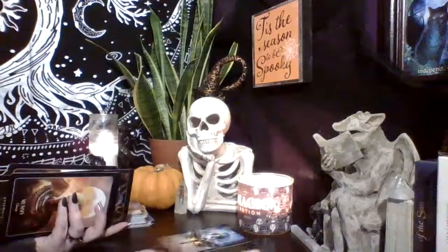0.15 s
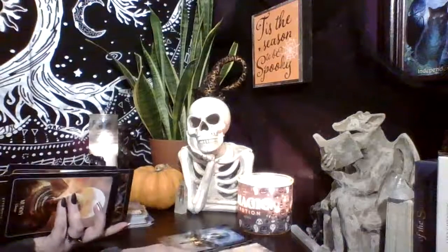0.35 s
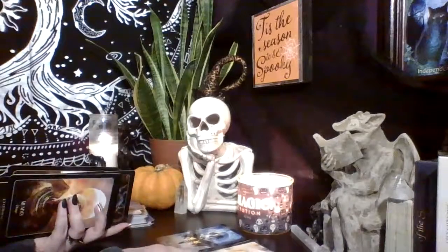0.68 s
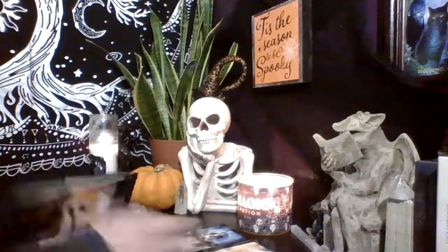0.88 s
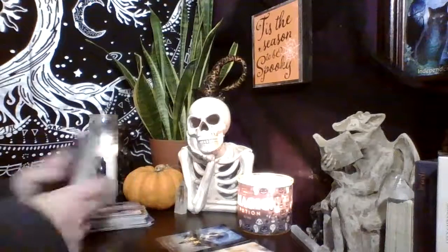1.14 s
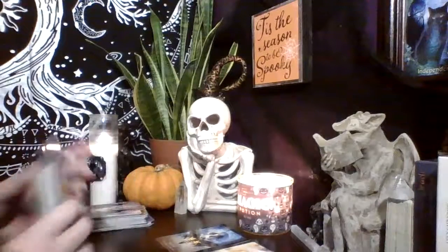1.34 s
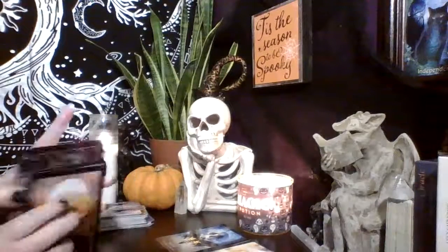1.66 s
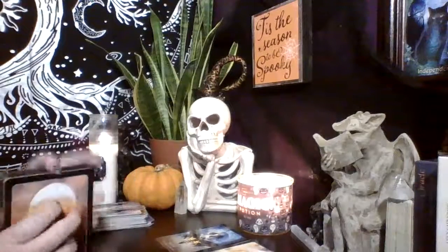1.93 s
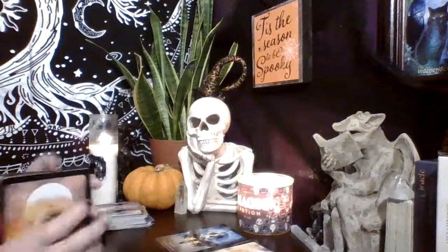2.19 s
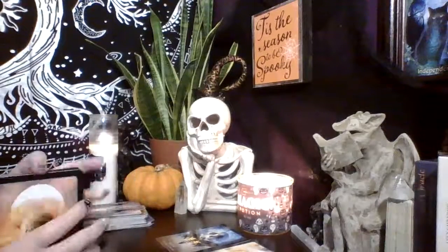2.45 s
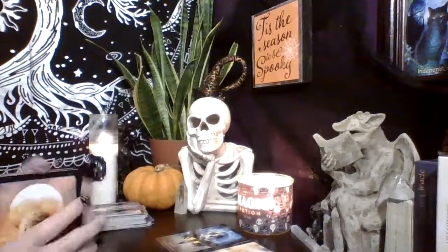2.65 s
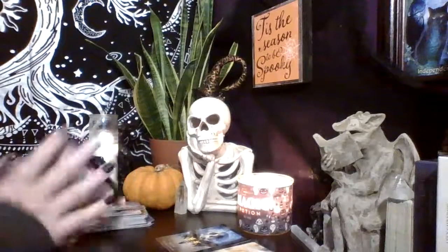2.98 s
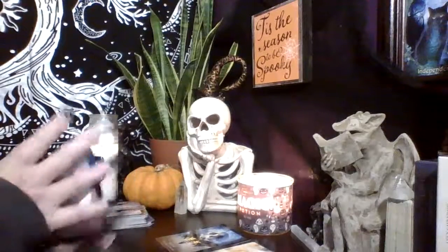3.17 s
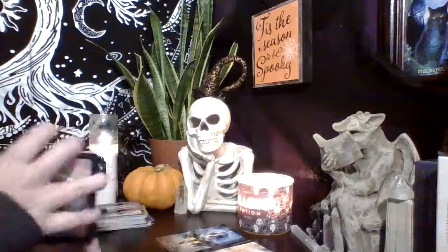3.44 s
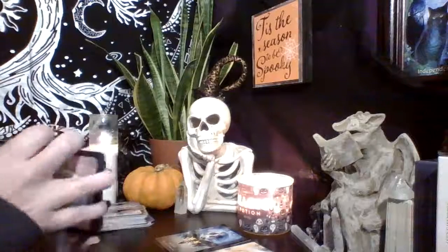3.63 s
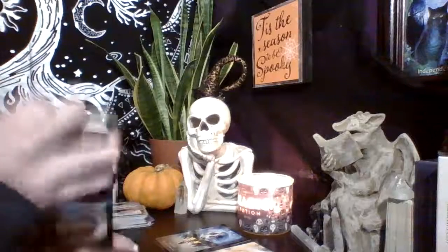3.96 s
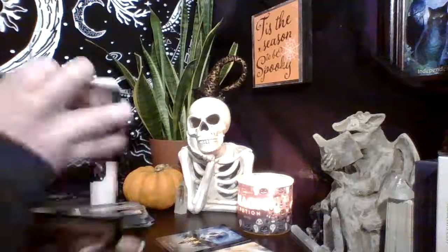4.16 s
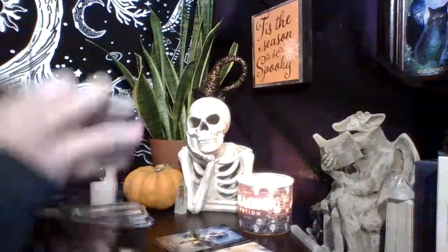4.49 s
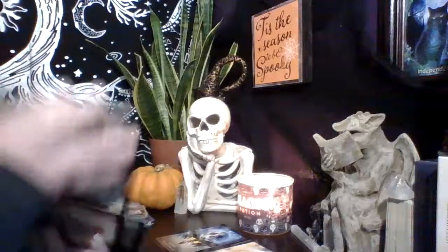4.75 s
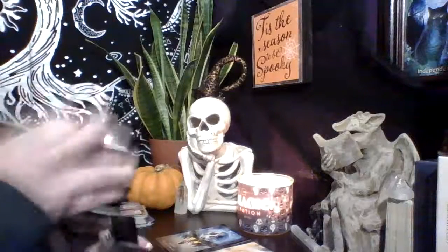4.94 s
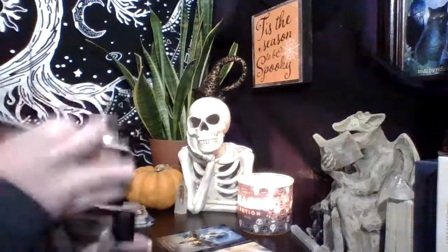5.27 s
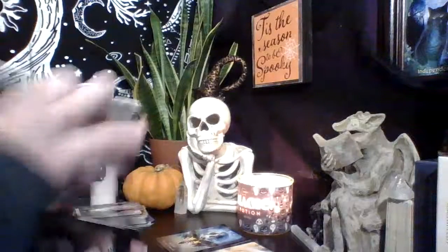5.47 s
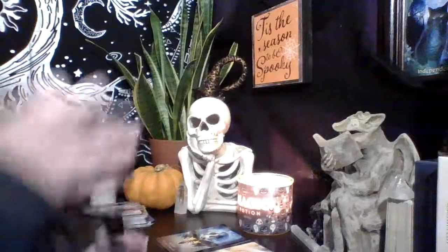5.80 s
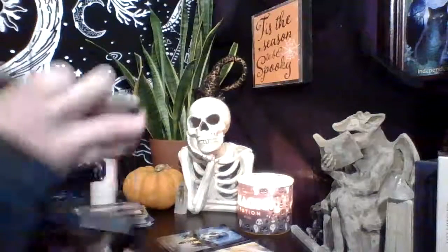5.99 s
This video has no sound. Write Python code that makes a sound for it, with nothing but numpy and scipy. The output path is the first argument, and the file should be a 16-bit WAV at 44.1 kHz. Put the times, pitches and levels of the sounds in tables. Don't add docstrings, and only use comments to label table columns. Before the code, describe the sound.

In a small furnished room with a steady low fan hum, hands barely rustle a deck of large cards. The deck's edges rattle against a wooden table in quick clusters of raps, then one violent flat slap overloads the close microphone on the same table. After a quiet spell of faint ticks, an overhand shuffle begins: short hisses, crisp flicks and packets clacking into the palm.

```python
import sys
import numpy as np
from scipy import signal
from scipy.fft import rfft, irfft, next_fast_len
from scipy.io import wavfile
from scipy.ndimage import uniform_filter1d, map_coordinates

SR = 44100
rng = np.random.default_rng(int(sys.argv[2]) if len(sys.argv) > 2 else 0)


def nominal_scale(level):
    x = np.asarray(level, float) / 20
    return 10 ** x


def pcm_store(signal):
    levels = np.round(np.clip(np.atleast_2d(signal), -1, 1) * 32767)
    wavfile.write(sys.argv[1], SR, levels.astype(np.int16).T)


N = 269892

# centre_hz, width_hz, level_db
TABLE_MODES = [(56.9, 14, -12), (88, 9.2, -3), (139.2, 30, -4), (293, 37, 0), (362, 43, 2), (577, 33, -2.5)]
# centre_hz, width_hz, level_db
DECK_MODES = [(792, 450, -8), (940, 500, -0.5), (1400, 190, 3.5), (1950, 750, -14.5)]
# centre_hz, width_hz, level_db
EDGE_MODES = [(2390, 220, -2.5), (2900, 530, -1), (3750, 490, -2), (4150, 790, -4), (5840, 1800, -16)]
# centre_hz, width_hz, level_db
HAND_MODES = [(45, 27, -7), (201, 26, 2.5), (403, 48, 11.5), (930, 850, -1)]

# start_s, peak_db, ring_hz, edge_db, thump_db
RAPS = [(1.357, -13, 1280, -27, -5), (1.365, -12.5, 600, -25.5, -23), (1.386, -17.5, 1460, -6.5, -27),
        (1.585, -21.5, 1350, -14, -8), (1.626, -20.5, 1400, -21, -8), (1.636, -7, 1450, -16, -7.5),
        (1.645, -17.5, 1490, -20, -1), (1.65, -11, 710, -33, -10), (1.657, -11.5, 1330, -22, -8),
        (1.663, -20.5, 2130, -21, -6), (1.6706, -15, 2740, -13, -5.5), (1.727, -24.5, 735, -32, 3),
        (1.835, -23, 940, -44, -7), (1.877, -22.5, 1700, -15, 1), (1.894, -15.5, 1690, -13, -7),
        (1.957, -13, 1400, 4.5, -13.5), (1.985, -11.5, 1480, -21, -15), (1.9953, -11.5, 1950, 6.5, -11),
        (1.998, -14, 1550, -3.5, -16), (2.003, -15, 2600, 2, -3.5), (2.058, -25.5, 1080, -35, 0),
        (2.178, -33, 1400, -18, -6)]
# start_s, peak_db, ring_hz, thump_db, snap_db
SLAP = [
    (2.417, 2.5, 960, -1.5, -30.5),
    (2.424, 8.5, 1960, -11, -15.5),
    (2.432, 0, 1160, -4.5, -24),
    (2.44, -8, 1940, 2.5, -35.5),
    (2.453, -14, 900, 4, -33.5),
    (2.464, -10.5, 1620, -7.5, -25),
    (2.474, -15, 1370, -7.5, -23),
]
# start_s, peak_db, thump_db
THUDS = [
    (1.467, -42, 19),
    (1.749, -32, 5),
    (1.842, -37, 13),
    (1.888, -30, 3),
    (1.899, -24, -2),
    (2.083, -41.5, 9),
    (2.629, -43, 10),
    (2.768, -41.5, 6),
    (2.783, -35.5, 3),
    (2.854, -40, 9),
]
# start_s, peak_db, edge_db, thump_db, snap_db
LANDINGS = [(3.9673, -24.5, -1, -7, -5), (4.4332, -27, -3, -8, 0), (4.4699, -27, -1, -8, -2),
            (4.846, -28.5, -1, -8, 4), (5.138, -30.5, -12, 5, -8), (5.377, -20, -18, -1.5, -3.5),
            (5.4206, -18.5, 0, -6.5, -6.5), (5.432, -17.5, -23, -15.5, -17), (5.4422, -24, -3, -23, 0),
            (5.682, -24, -7, -1.5, -3), (5.72, -23, 3, 2.5, -7), (5.734, -13.5, -22, -15, -23.5),
            (5.74, -15, -25, -21.5, -12), (6.0227, -26, 9, -1, 3), (6.036, -19.5, -21, -5.5, -14),
            (6.042, -24, -6, -6, -1.5)]
# start_s, peak_db, ring_hz, edge_db, snap_db
EDGEWISE = [(3.818, -28, 1610, 1.5, -14), (3.958, -11, 1230, -11.5, -19.5), (3.977, -14.5, 1780, -1.5, -12),
            (4.022, -28, 1380, 0.5, -5), (4.047, -8.5, 1040, -18, -17.5), (4.506, -30, 2020, -1, -9),
            (4.517, -30, 1280, -9, 2.5), (4.671, -30.5, 2110, 3.5, 4.5), (4.784, -27.5, 2230, -5, -2),
            (5.127, -31.5, 2810, 6, 9.5), (5.154, -24, 1313, -5, -1), (5.98, -25, 2700, -7, -0.5)]
# start_s, peak_db, ring_hz, thump_db
CATCHES = [(1.1, -43, 1520, -24), (1.563, -36, 1370, -27), (3.761, -37, 1430, -18.5),
           (3.812, -36, 886, 7.5), (4.459, -30, 920, -10), (4.56, -44, 1330, -12), (4.833, -28, 2160, -16),
           (5.025, -34.5, 1310, -14), (3.987, -36, 1890, -22), (5.079, -32, 960, -2),
           (5.322, -37.5, 1460, -4), (5.886, -27, 1240, -8), (5.929, -39, 1290, -2)]
# start_s, peak_db, edge_db
TICKS = [(0.064, -43, -21), (2.928, -53.5, -15), (3.022, -48.5, -15.5), (3.186, -44.5, 1.5),
         (3.245, -51, -9.5), (3.499, -47, 8), (3.634, -46.5, -9), (4.202, -47, -14.5), (4.355, -43.5, 7.5),
         (4.382, -40.5, -4), (4.59, -37.5, -11), (4.65, -42, -1), (4.981, -49, -8), (5.279, -46, 4),
         (5.331, -42, -7.5), (5.593, -43, -2.5), (5.621, -43.5, -7.5)]
# start_s, pitch_hz, peak_db, t60_s
PINGS = [(1.5852, 1360, -18, 0.013), (1.645, 1400, -16, .015), (1.6588, 2900, -17.5, 0.016),
         (1.985, 2780, -16, .012), (1.998, 2820, -12, 0.012), (2.004, 2750, -11, 0.016),
         (2.428, 286, -4.5, .08), (2.436, 508, -9, 0.048), (2.452, 88, -12.5, .2),
         (5.381, 2750, -30, 0.022), (2.436, 1810, -8, .012), (2.442, 1930, -7, .012),
         (2.454, 1930, -8, 0.013), (2.4744, 1380, -18, .02), (2.4745, 4160, -13.5, 0.015),
         (2.613, 1440, -45, 0.044), (2.63, 192.6, -29.5, 0.066), (2.745, 375, -36, 0.16),
         (2.785, 600, -39.5, 0.07), (2.851, 383, -31.5, 0.08), (3.186, 3420, -50.5, .02),
         (3.819, 4860, -22.5, 0.0065), (3.9592, 1380, -17.5, 0.011), (3.9663, 6340, -21, .006),
         (3.9761, 6700, -19, 0.0053), (3.98, 1530, -18, .012), (3.986, 4270, -25, .01),
         (4.0217, 6340, -22, 0.0073), (4.4325, 5650, -18.5, .006), (4.4325, 8600, -20, .004),
         (4.459, 3500, -31, .008), (4.4695, 5070, -28, .008), (4.4712, 12950, -30, .005),
         (4.6711, 5900, -28, 0.0031), (4.671, 13500, -25, .004), (4.681, 4500, -41, 0.0055),
         (4.7842, 2210, -30, .014), (4.792, 13500, -26, .005), (4.8445, 12100, -23, .008),
         (4.865, 5500, -38, .008), (5.397, 965, -36, 0.012), (5.434, 1210, -26, 0.017),
         (5.441, 1240, -25, 0.0094), (5.6824, 2730, -29, .01), (5.7205, 3600, -18, 0.0075),
         (5.7348, 1230, -19, 0.019), (5.9824, 2800, -27, .01), (6.0244, 3950, -17.5, 0.0065),
         (6.036, 1300, -32, 0.0091), (6.0431, 1200, -24, 0.0091)]
# start_s, pitch_hz, peak_db, t60_s
MORE_PINGS = [
    (1.358, 370, -20, 0.051),
    (1.681, 370, -23, .05),
    (1.9571, 4600, -15, .006),
    (2.003, 370, -22, .07),
    (2.4183, 137, -5.5, .13),
    (2.465, 4800, -20, .012),
    (5.3772, 12500, -24.5, 0.0046),
    (1.7035, 1800, -38, .008),
]

# start_s, length_s, first_hiss_db, last_hiss_db, body_over_hiss_db
STROKES = [(1.561, 0.02, -45, -45, -2), (1.586, 0.04, -33.5, -46.5, 1.5), (3.763, 0.031, -41.5, -45, 2),
           (3.8, 0.014, -42.5, -32, -2), (3.964, 0.015, -42, -35.5, 11.5), (4.02, .002, -37, -43, -4),
           (4.034, .019, -37.5, -28, 2), (4.399, 0.022, -56, -40.5, 2.5), (4.433, 0.0022, -38, -33.5, 5),
           (4.44, 0.079, -47, -31.5, -0.5), (4.651, 0.038, -52, -43, -0.5), (4.784, 0.01, -41, -32.5, 1),
           (4.799, .028, -34, -35, -11), (4.831, 0.015, -35.5, -28, -1.5), (5.077, 0.02, -45, -37, -1),
           (5.096, 0.053, -35.5, -27.5, -3.5), (5.38, .014, -36, -35, 4), (5.396, 0.046, -36, -39, 2),
           (5.683, 0.039, -37, -34, 3), (5.723, 0.013, -42, -32, 0.5), (5.98, 0.009, -53, -38, 7.5),
           (5.993, 0.051, -36.5, -35.5, 1.5)]
# start_s, hiss_db, fade_s (for 15 dB), body_over_hiss_db
JERKS = [(0.0, -56.5, .12, 0.5), (0.064, -54, .06, -15), (2.926, -61, .04, -8), (3.024, -56.5, .08, -10),
         (3.184, -62, .3, -5), (3.266, -68, .9, -1), (3.5, -49, .075, 0.5), (4.354, -52, .04, -2),
         (4.52, -45, .1, -3), (4.562, -43, .04, 2.5), (4.69, -53, .3, -3), (4.982, -46.5, .028, 0.5),
         (5.022, -51, .4, -1), (5.286, -47, .035, -6), (5.596, -45, .012, 1.5), (5.887, -43.5, .035, -4),
         (5.929, -44, .022, -12)]
# peak_s, hiss_db, swell_s, fade_s (for 15 dB), body_over_hiss_db
RUSTLES = [(0.142, -50, 0.12, .9, -7.5), (0.27, -52, 1, 0.17, -1), (0.856, -60, .056, .4, 0),
           (1.102, -54.5, 0.24, 0.044, 6.5), (1.22, -54.5, 0.17, 0.069, 4),
           (1.336, -47, 0.073, 0.049, -2.5), (1.45, -50, 0.28, .11, -1), (1.55, -52, .6, .03, 5.5),
           (1.644, -43, 0.059, 0.03, 14.5), (1.912, -43.5, 0.035, .2, -9), (2.008, -59, 0.045, 0.033, 11),
           (2.26, -61, 0.038, 0.028, 13), (2.65, -59, 0.078, 0.34, -1), (2.73, -58, 0.34, 0.23, -4),
           (2.776, -57.5, 0.044, 0.029, 11.5), (2.864, -63, 0.063, .05, 5), (3.644, -60.5, 0.1, .4, 0.5),
           (3.75, -51.5, 0.088, 0.033, 2.5), (4.226, -52, .06, 0.03, -6), (4.768, -39, 0.004, 0.035, -1.5),
           (5.364, -52, 0.14, 0.038, 0), (5.672, -47.5, 0.085, .012, -7), (5.972, -46, 0.061, 0.016, 0),
           (3.685, -62, 0.035, 0.17, 6), (3.91, -56, .05, 0.044, -7)]
# frequency_hz, density_db
HISS_SPECTRUM = [(2300, -8), (4000, -2.5), (8000, 0), (9500, -2.5), (13000, 0.5), (15800, 0)]
# frequency_hz, density_db
BODY_SPECTRUM = [(300, 5.5), (700, -2), (1300, -1.5), (2500, -1), (4500, -6), (8000, -25)]
# middle_s, length_s, centre_hz, width_hz, level_db
SCRAPES = [(1.092, 0.036, 3970, 1800, -53), (1.225, .03, 5470, 3000, -52), (1.305, 0.036, 4200, 2500, -52),
           (1.443, 0.055, 9300, 900, -53.5), (1.449, 0.079, 6300, 1210, -58),
           (1.445, .05, 14000, 1500, -54), (1.511, 0.059, 3670, 1200, -62),
           (1.599, 0.024, 2900, 1800, -35.5), (1.66, 0.017, 2500, 1160, -31),
           (1.692, 0.019, 2200, 1200, -53), (2.468, 0.014, 2460, 703, -17.5),
           (2.491, 0.0094, 3010, 2500, -37), (2.506, 0.0069, 3160, 2980, -45),
           (2.528, 0.043, 2440, 2440, -48), (3.688, 0.043, 4020, 1500, -57.5),
           (3.778, 0.039, 3600, 2500, -41.5), (4.085, 0.02, 8000, 7970, -49),
           (4.419, 0.011, 3600, 700, -43), (4.842, 0.012, 4500, 1000, -32),
           (4.845, 0.0037, 6700, 1490, -28), (5.132, 0.0092, 6230, 2970, -30),
           (5.166, 0.0048, 3300, 1490, -31), (6.019, 0.0056, 5950, 2500, -35),
           (6.055, 0.0055, 4500, 3000, -41), (4.434, 0.0014, 6950, 7000, -18.5),
           (5.155, 0.0018, 5030, 5000, -28), (3.966, 0.01, 1400, 500, -31), (3.989, 0.0061, 1870, 600, -32),
           (3.978, 0.0043, 3500, 1500, -17.5), (4.03, 0.016, 1400, 500, -38),
           (5.429, 0.0058, 1100, 900, -28.5), (2.445, 0.016, 239.2, 59.9, -13)]
# start_s, length_s, from_hz, to_hz, level_db
SQUEAKS = [
    (1.92, .036, 2700, 3200, -38),
    (1.19, .055, 5900, 6000, -57),
    (1.587, .045, 1450, 1250, -31),
]
# peak_s, level_db, width_s, swing_delay_s
PUFFS = [(1.841, -20, 0.0034, 0.0037), (1.883, -13.5, 0.0031, 0.0045), (1.9057, -14, 0.0016, 0.0042),
         (1.65, -28, 0.006, 0.0033), (2.093, -27, 0.0032, 0.0032), (1.469, -19.5, 0.0032, 0.0035),
         (1.682, -17.5, 0.0008, 0.0044), (2.458, -9, 0.0014, 0.0036), (3.96, -24, 0.00057, 0.0046),
         (4.048, -23, 0.0025, 0.006), (4.848, -36, 0.0024, 0.0053), (5.13, -28, 0.0028, 0.012),
         (5.421, -16, 0.0016, 0.0092), (5.721, -20.5, 0.0023, 0.0094), (6.023, -25, 0.005, 0.012)]

# time_s, rumble_db
LEANS = [
    (1.3, -58),
    (1.428, -51),
    (1.542, -37),
    (1.864, -33.5),
    (1.974, -26),
    (2.144, -34.5),
    (2.35, -43),
]
# frequency_hz, t60_s
ROOM_DECAY = [(100, 0.15), (1000, 0.14), (4000, 0.1), (12000, 0.069)]
# pitch_hz, rms_db
FAN_LINES = [(92.5, -45.5), (185, -58), (279, -51), (668, -66), (770, -67.5), (900, -62)]
# frequency_hz, density_db
AIR_SPECTRUM = [(20, -9), (57, 1), (75, -14), (110, -8), (150, -10), (190, -0.5), (300, -9.5), (390, -15),
                (500, -21.5), (950, -22), (1690, -30.5), (3420, -39.5), (8000, -47), (15800, -43)]
TREBLE_DIPS = [.055, 1.87, 2.408, 2.918, 3.178, 3.946, 4.429, 4.666, 4.774, 4.972, 5.265, 5.371, 5.668,
               5.968]


def unit(x):
    return x / np.sqrt(np.mean(x ** 2) + 1e-20)


def along(points, hz):
    f, v = np.transpose(points)
    return np.interp(np.log(hz + 1), np.log(f + 1), v)


def wobble(rate):
    at = np.arange(0, N + 16, 16)
    knots = rng.standard_normal(int(N * rate / SR) + 4)
    return np.interp(np.arange(N), at, map_coordinates(knots, [at * rate / SR]))


def filtered(x, response):
    m = next_fast_len(x.shape[-1] + 8192)
    spectrum = rfft(x, m) * response(np.fft.rfftfreq(m, 1 / SR))
    return irfft(spectrum, m)[..., :x.shape[-1]]


def resonant(modes):
    def response(f):
        return sum((-1) ** k * nominal_scale(db) * 1j * f * w / (c * c - f * f + 1j * f * w)
                   for k, (c, w, db) in enumerate(modes))
    return response


def above(corner_hz):
    return lambda hz: (1j * hz / corner_hz / (1 + 1j * hz / corner_hz)) ** 3


def below(corner_hz):
    return lambda hz: (1 + 1j * hz / corner_hz) ** -4


def coloured(spectrum):
    return unit(filtered(rng.standard_normal(N), lambda hz: nominal_scale(along(spectrum, hz))))


def random_patches(shape, bins, frames):
    field = uniform_filter1d(rng.standard_normal(shape), size=bins, axis=0)
    return uniform_filter1d(field, size=frames, axis=1)


def patchy(spectrum, depth_db):
    z = signal.stft(coloured(spectrum), nperseg=256)[2]
    field = random_patches(z.shape, 9, 7)
    return unit(signal.istft(z * nominal_scale(depth_db * unit(field)), nperseg=256)[1][:N])


def knocks():
    events = [(s, db, hz, edge, low, -29 + 0.41 * edge) for s, db, hz, edge, low in RAPS]
    events += [(s, db, hz, -1 + k, low, high) for k, (s, db, hz, low, high) in enumerate(SLAP)]
    events += [(s, db, 813, -17, low, -23) for s, db, low in THUDS]
    return contacts(events, TABLE_MODES, t60=0.028, ring_db=13.5, deck_db=6.5, edge_db=14.0,
                    thump_db=24.5, snap_db=6.5, width=0.3, soft_hz=4870)


def flicks():
    events = [(s, db, 1000, edge, low, high) for s, db, edge, low, high in LANDINGS]
    events += [(s, db, hz, edge, -18 - 0.38 * db, high) for s, db, hz, edge, high in EDGEWISE]
    events += [(s, db, hz, -3, low, -5) for s, db, hz, low in CATCHES]
    events += [(s, db, 850, edge, -10, -1) for s, db, edge in TICKS]
    return contacts(events, HAND_MODES, t60=0.012, ring_db=15.5, deck_db=10.0, edge_db=16.5,
                    thump_db=17.5, snap_db=8.5, width=0.12, soft_hz=4700)


def contacts(events, support, t60, ring_db, deck_db, edge_db, thump_db, snap_db, width, soft_hz):
    rattle, clack, ring, push, snap = np.zeros((5, N + 4096))
    t = np.arange(3072) / SR
    noise = rng.standard_normal((len(events), 4, len(t)))
    for (s, db, hz, edge, low, high), (a, b, c, d) in zip(events, noise):
        at = slice(round(s * SR), round(s * SR) + len(t))
        decay = nominal_scale(db - 60 * t / t60) + nominal_scale(db - 20.0 - 60 * t / 0.044)
        burst = decay * (1 - np.exp(-t / 0.00025))
        rattle[at] += burst * np.tanh(a) * 1.52
        sung = filtered(burst * b, resonant([(hz, width * hz, 0)]))
        ring_rms = np.sqrt(np.pi * width * hz / SR * np.mean(burst ** 2))
        ring[at] += nominal_scale(ring_db) * ring_rms * unit(sung)
        clack[at] += nominal_scale(edge) * burst * (1 + 1.3 * nominal_scale(-60 * t / 0.0023)) * d
        push[at] += nominal_scale(db + low) * t / 0.00085 * np.exp(-t / 0.0006)
        snap[at] += nominal_scale(high) * burst * (nominal_scale(-60 * t / 0.096) + 2.7 * nominal_scale(-60 * t / 0.0015)) * c
    block = filtered(ring + nominal_scale(deck_db) * filtered(rattle, resonant(DECK_MODES)), below(soft_hz))
    edges = filtered(clack, lambda hz: resonant(EDGE_MODES)(hz) * below(9000)(hz) * above(1500)(hz))
    thump = filtered(push, resonant(support))
    bright = filtered(snap, lambda hz: above(4000)(hz) * below(40000)(hz))
    return (block + nominal_scale(edge_db) * edges + nominal_scale(thump_db) * thump + nominal_scale(snap_db) * bright)[:N]


def pings():
    out, t = np.zeros(N + 4096), np.arange(4096) / SR
    for s, hz, db, t60 in PINGS + MORE_PINGS:
        envelope = nominal_scale(db + 4.5 - 60 * t / t60) * (1 - np.exp(-t * hz / 0.4))
        out[round(s * SR):][:len(t)] += envelope * np.sin(2 * np.pi * hz * t)
    return out[:N]


def slides():
    grip_s, let_go_s, settle_s, jerk_s = 0.0063, 0.016, 0.054, 0.0066
    settle_db = -16
    reach_s, stop_s = 0.12, 0.05
    moves = []
    for s, length, a, b, body in STROKES:
        moves.append((s, length, a, b, grip_s, let_go_s, body))
        moves.append((s + length, 0, b + settle_db, b + settle_db, grip_s, settle_s, body))
    moves += [(s, 0, db, db, jerk_s, fade, body) for s, db, fade, body in JERKS]
    moves += [(s, 0, db, db, swell, fade, body) for s, db, swell, fade, body in RUSTLES]
    level, t = np.zeros((2, N)), np.arange(N) / SR
    for s, length, from_db, to_db, rise, fall, body_db in moves:
        on = slice(max(round((s - reach_s) * SR), 0), round((s + length + reach_s) * SR))
        u = t[on] - s
        db = np.interp(u, [0, length + 1e-6], [from_db, to_db])
        db = db - 15 * (np.maximum(-u, 0) / rise + np.maximum(u - length, 0) / fall)
        gain = nominal_scale(db) * np.clip((reach_s - np.maximum(-u, u - length)) / stop_s, 0, 1)
        level[:, on] = np.maximum(level[:, on], gain * nominal_scale([[0], [body_db]]))
    grain = unit(nominal_scale(1.7 * wobble(60) + 1.0 * wobble(500)))
    hiss, body = uniform_filter1d(grain * level, size=20)
    rubbing = nominal_scale(1.2) * hiss * patchy(HISS_SPECTRUM, depth_db=3.0)
    return rubbing + nominal_scale(-1.5) * body * patchy(BODY_SPECTRUM, depth_db=3.5)


def scrapes():
    out, t = np.zeros(N), np.arange(8192) / SR
    middle = t.mean()
    noises = rng.standard_normal((len(SCRAPES), len(t)))
    for (s, length, hz, width, db), noise in zip(SCRAPES, noises):
        mode = resonant([(hz, width, 0)])
        strip = unit(filtered(noise, lambda f: mode(f) ** 2))
        swell = nominal_scale(db) * np.exp(-(2 * (t - middle) / length) ** 2)
        start = round((s - middle) * SR)
        out[start:][:len(t)] += (swell * strip)[:N - start]
    return out


def squeaks():
    hz, gain = np.zeros((2, N))
    for s, length, from_hz, to_hz, db in SQUEAKS:
        u = np.clip((np.arange(N) / SR - s) / length, 0, 1)
        hz += (u > 0) * (u < 1) * (from_hz + (to_hz - from_hz) * u)
        gain += nominal_scale(db) * np.sin(np.pi * u)
    phase = 2 * np.pi * np.cumsum(hz * (1 + 0.04 * wobble(300))) / SR
    return gain * nominal_scale(4 * wobble(200)) * np.sin(phase)


def puffs():
    t, out = np.arange(N) / SR, np.zeros(N)
    for s, db, width, back in PUFFS:
        on = slice(round((s - 0.03) * SR), round((s + 0.05) * SR))
        rise = np.exp(-(2 * (t[on] - s) / width) ** 2)
        swing = np.exp(-(2 * (t[on] - (s + back)) / (1.1 * width)) ** 2)
        out[on] += nominal_scale(db) * (rise - swing)
    return out


def stray(x):
    hz, _, z = signal.stft(x, SR, nperseg=1024)
    field = random_patches(z.shape, 30, 4)
    loud = np.mean(np.abs(z[hz > 8000]) ** 2, axis=0) > nominal_scale(-128)
    kept = np.sign(field) * (np.abs(unit(field)) > 1.4) * loud * (hz > 7500)[:, None]
    return nominal_scale(4) * signal.istft(z * kept, SR, nperseg=1024)[1][:N]


def room(x):
    step, wet = SR // 8, np.zeros(N + SR)
    starts = range(0, N, step)
    hz, t, z = signal.stft(rng.standard_normal((len(starts), SR // 4)), SR, nperseg=256)
    decay = nominal_scale(-60 * t / along(ROOM_DECAY, hz)[:, None])
    tails = signal.istft(z * decay, SR, nperseg=256)[1]
    for at, tail in zip(starts, tails):
        answer = signal.fftconvolve(x[at:at + step], tail / np.linalg.norm(tail))
        wet[at + 150:][:len(answer)] += answer
    return wet[:N]


def leaning():
    s, db = np.transpose(LEANS)
    pressure = coloured([(20, 4.5), (60, 4.0), (100, 2), (300, -24.0)])
    shake = unit(filtered(pressure, resonant(TABLE_MODES)))
    return nominal_scale(np.interp(np.arange(N) / SR, s, db - 3.5, -120, -120)) * shake


def fan():
    t, out = np.arange(N) / SR, np.zeros(N)
    for hz, db in FAN_LINES:
        gain = nominal_scale(db + 3 + 1.2 * wobble(4))
        out += gain * np.sin(2 * np.pi * hz * t + hz / 200 * wobble(5))
    return out


def air():
    return nominal_scale(-38 - 1.5 + 0.36 * wobble(3.1)) * coloured(AIR_SPECTRUM)


def scene():
    table = knocks()
    hand = flicks() + pings()
    rub = slides() + scrapes()
    apart = stray(rub)
    direct = table + hand + rub + squeaks() + puffs()
    reflected = nominal_scale(-11.5) * room(table) + nominal_scale(-14.0) * room(hand + rub)
    mid = direct + reflected + leaning() + fan() + air()
    return np.array([mid + apart, mid - apart])


def top_cut(x):
    return signal.sosfilt(signal.butter(12, 17060, fs=SR, output="sos"), x)


def record(dry):
    dip_width_s, dip_share, dip_hz, top_hz = 0.008, 0.7, 2500, 15950
    t = np.arange(N) / SR
    dip = sum(np.exp(-(2 * (t - s) / dip_width_s) ** 4) for s in TREBLE_DIPS)
    treble = filtered(dry, lambda hz: hz ** 4 / (hz ** 4 + dip_hz ** 4))
    dulled = dry - dip_share * dip * treble
    clipped = dulled / (1 + np.abs(dulled / 0.99) ** 12) ** (1 / 12)
    mix = filtered(clipped, lambda hz: nominal_scale(-48 / (1 + np.exp(np.clip((top_hz - hz) / 40, -50, 50)))))
    return top_cut(mix)


dry = scene()
out = record(dry)
pcm_store(out)
```